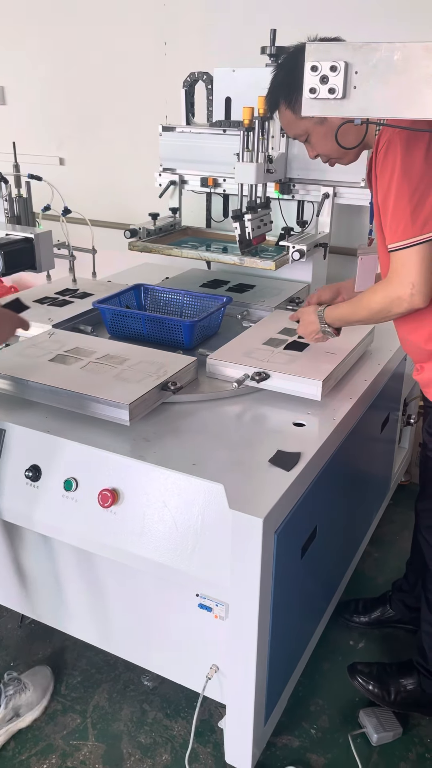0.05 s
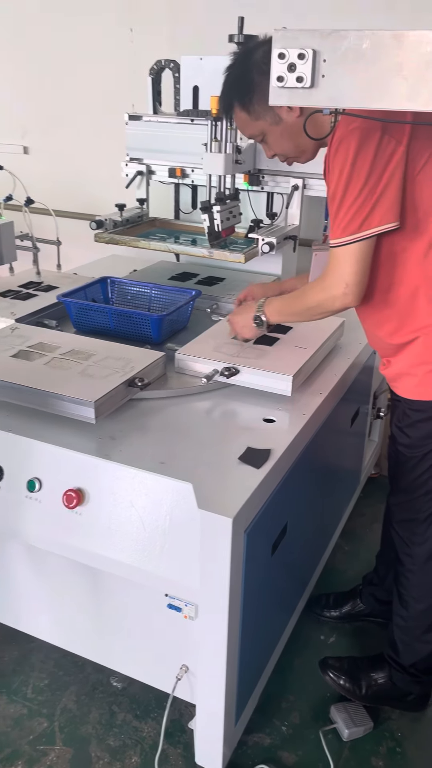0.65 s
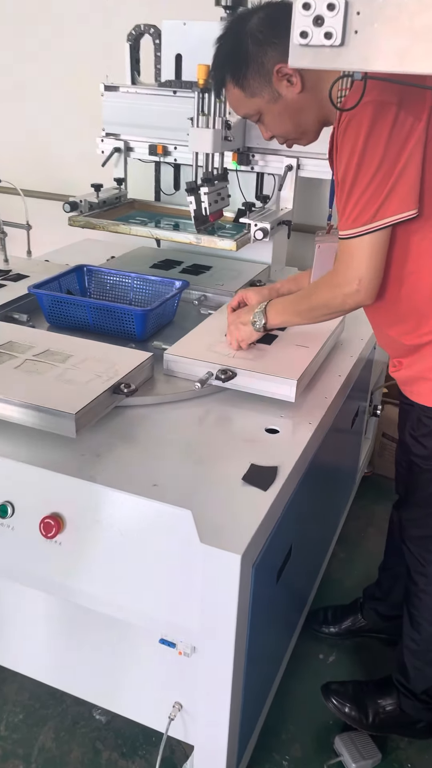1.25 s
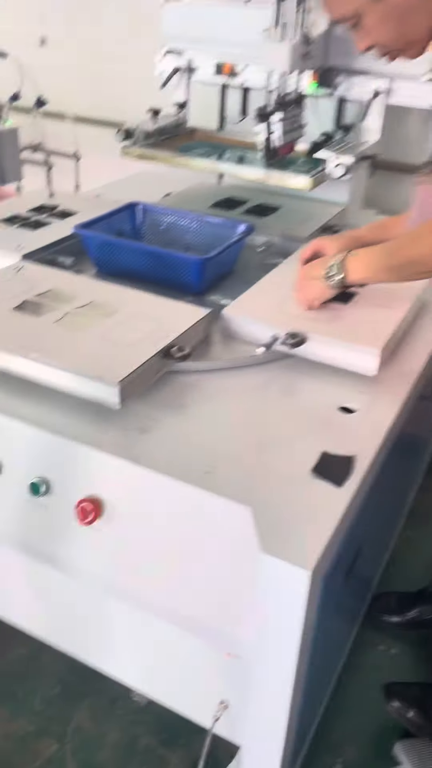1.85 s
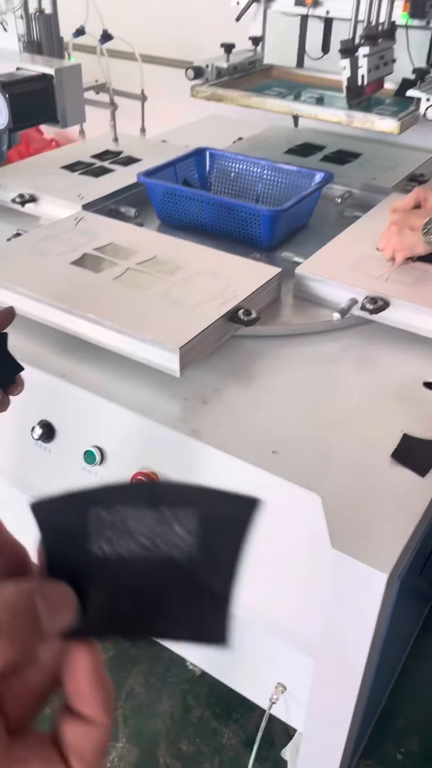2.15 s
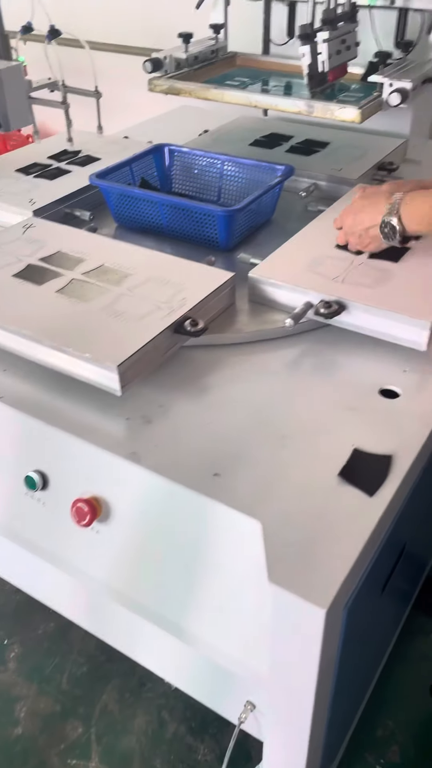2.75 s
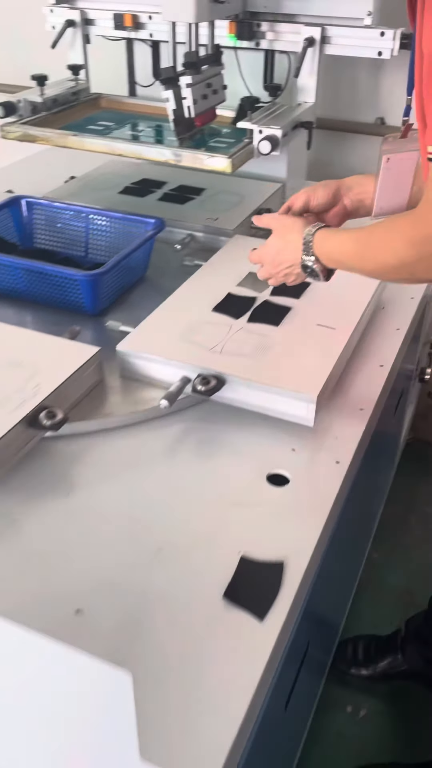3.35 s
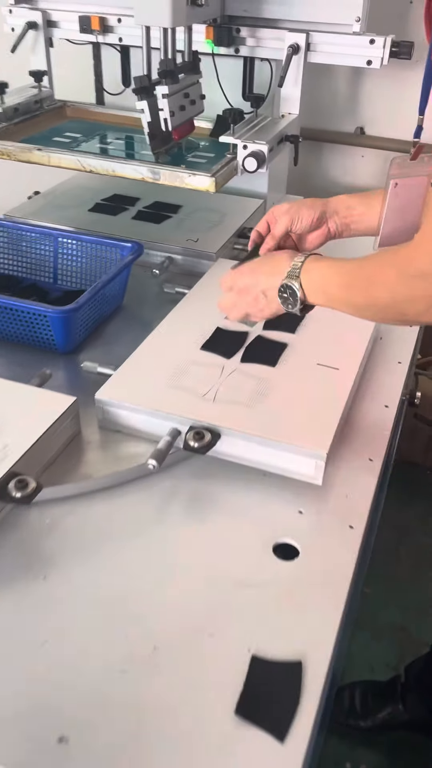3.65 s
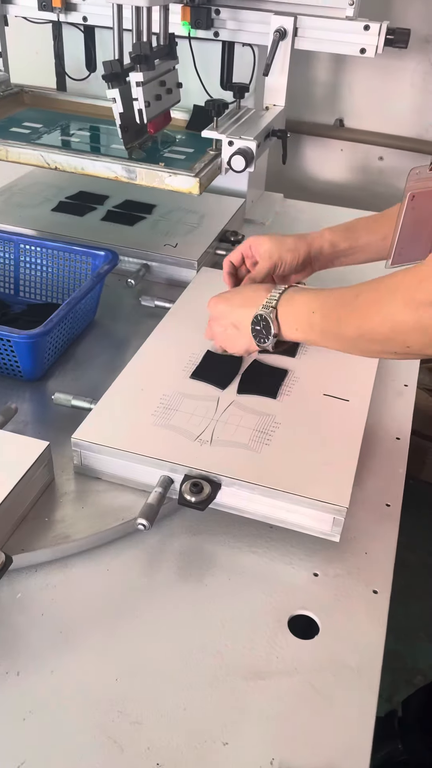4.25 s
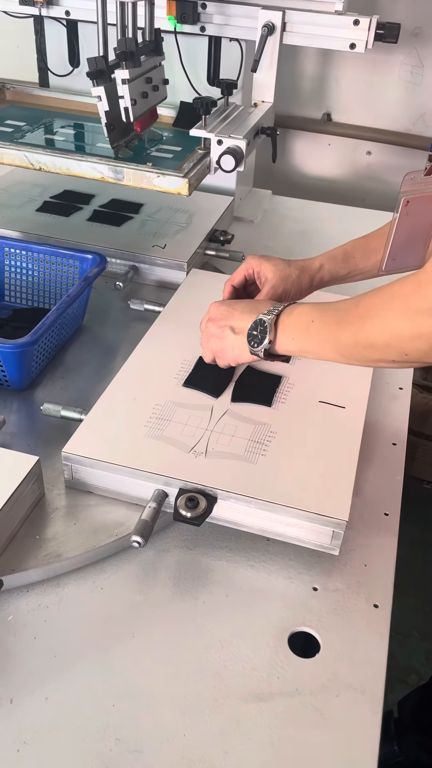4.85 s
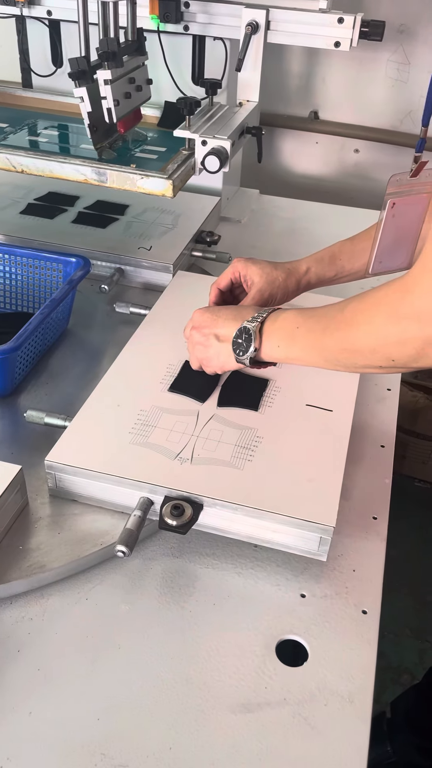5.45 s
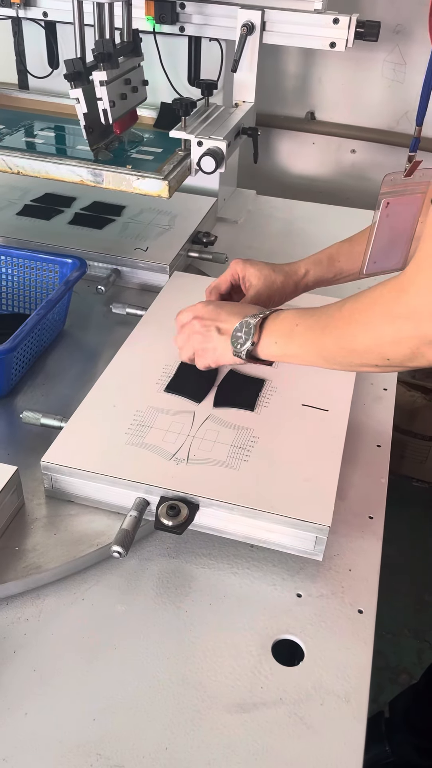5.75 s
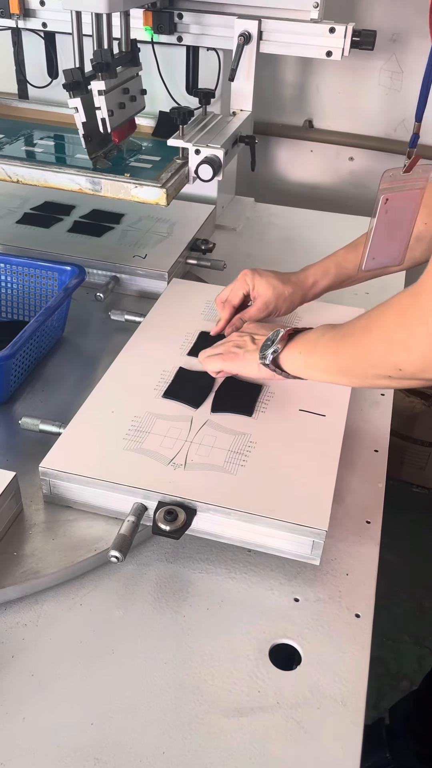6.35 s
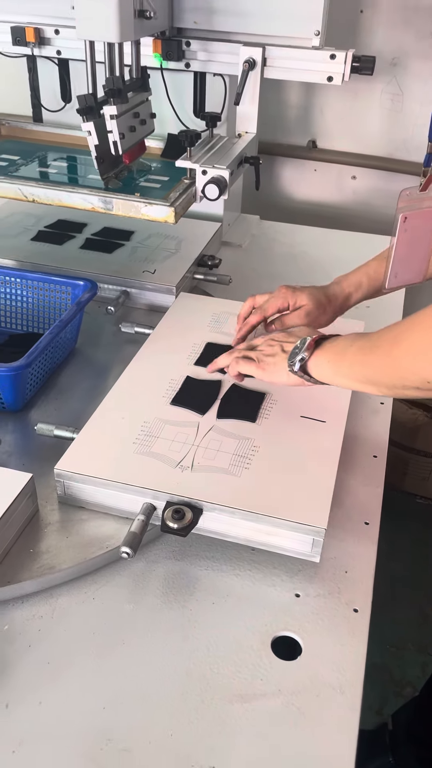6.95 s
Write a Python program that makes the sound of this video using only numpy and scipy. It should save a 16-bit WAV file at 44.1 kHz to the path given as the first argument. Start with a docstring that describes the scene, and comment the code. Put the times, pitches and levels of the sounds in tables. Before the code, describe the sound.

A screen printing machine idles in a workshop. Its vacuum blower gives a high, throbbing whine that swells and fades over a loud motor drone and rushing air. A valve lets off one short puff about two seconds in. As the hand-held microphone moves closer, the drone and a sputtering air leak turn brighter. Near the end the drone gives one brief low boom.

```python
"""A workshop: a screen printer with a rotary vacuum table idles, heard on a hand-held stereo microphone
that moves up to it. The vacuum blower's blades sing a high, throbbing whine, which swells and fades in
standing waves, over rushing air, the drone of motors and panels and the hiss of a leak. The drone's
colour shifts over the first three seconds, then drone and hiss turn close and bright.
A valve lets off one short puff, and near the end the drone booms once."""
import sys
import numpy as np
from scipy import signal
from scipy.fft import next_fast_len
from scipy.io import wavfile
from scipy.ndimage import uniform_filter1d

SR = 44100
rng = np.random.default_rng(int(sys.argv[2]) if len(sys.argv) > 2 else 0)


def put_to_file(sound):
    """Save the sound as 16-bit audio at rate SR, in the file named by the first command-line argument."""
    columns = np.atleast_2d(sound).T  # one column per channel
    safe = np.clip(columns, -1, 1)
    whole_steps = np.round(safe * 32767)
    wavfile.write(sys.argv[1], SR, whole_steps.astype(np.int16))


N = 308259
FRAME, HOP = 4096, 1024  # noise is shaped frame by frame; both in samples
TIME = np.arange(N) / SR
FRAME_TIME = np.arange(N // HOP + 5) * HOP / SR
BIN_HZ = np.fft.rfftfreq(FRAME, 1 / SR)
# how close the printer sounds: t/s, blend (0 far colour, 1 near colour)
NEARNESS = [(0, 0.55), (2.6, 0.05), (3.4, 0.24), (4.1, 1), (7, 1)]


def blower_whine(jitter_hz=0.22, throb_hz=(15.5, 15), throb_drift_hz=0.77, hand_shake=0.08):
    """The blade tone with its throb, rattle, whistle and octave, heard through standing waves."""
    # blade tone at the microphone: t/s, left level/dB, right level/dB
    tone_levels = [(0, -22, -28), (.27, -26, -31.5), (.5, -24.5, -40), (.63, -26, -35), (.83, -19.8, -38),
                   (1.0, -23.5, -34.5), (1.12, -23, -34), (1.35, -28.5, -26.8), (1.52, -29, -26),
                   (1.6, -38, -28), (1.75, -26, -33), (1.92, -38.5, -39), (2.05, -41, -32.5),
                   (2.25, -42.3, -33), (2.5, -32, -38), (2.62, -30.5, -36), (2.82, -32.1, -28.8),
                   (3.13, -34, -31.5), (3.22, -26.5, -28.5), (3.31, -25, -29), (3.43, -31.4, -31.5),
                   (3.6, -27.5, -25.3), (3.73, -23, -27), (3.88, -25, -34), (4.05, -24, -30.8),
                   (4.22, -20.8, -28.8), (4.98, -20.6, -30), (5.1, -23, -31.5), (5.3, -22.5, -29.3),
                   (5.65, -23, -29.8), (5.88, -21.6, -30), (6.04, -24.5, -30), (6.22, -39, -34),
                   (6.32, -38, -32), (6.44, -44.5, -40), (6.6, -32.5, -35.7), (6.85, -26.3, -26),
                   (6.99, -26, -23.5)]
    # direction it arrives from: t/s, left phase lead/rad
    bearing = [(0, 2.1), (.47, 1.4), (.55, 0.4), (.77, 1.1), (.84, 2.5), (1, 1.5), (1.15, 4), (1.65, 1.7),
               (1.92, 2.3), (2.05, 1), (2.4, 3), (3.1, 2.5), (3.4, 0.5), (3.6, 0.4), (3.77, 0.7),
               (3.92, -0.9), (4.3, 0.36), (5.4, 0.67), (5.9, 1.1), (6.6, 1.9), (6.99, 0.6)]
    # the blower slows a little as its load changes: t/s, blade tone f/Hz
    pitch = [(0, 2447.5), (.45, 2447), (1, 2451), (1.4, 2445), (1.8, 2447), (2.2, 2445.5), (2.4, 2441.5),
             (2.8, 2438), (3.1, 2439), (3.55, 2433.5), (4.9, 2433.3), (5.3, 2430.3), (5.8, 2433),
             (6.2, 2419), (6.6, 2414), (6.99, 2418.5)]
    # the throb's sidebands on the left: t/s, lower level/dB, upper level/dB
    sideband_levels = [(0, -46, -42), (.25, -36, -39), (.55, -49, -50), (.85, -38, -33), (.96, -41, -41),
                       (1.06, -34.5, -35), (1.3, -42, -45), (1.55, -43, -47), (1.8, -30.5, -46),
                       (1.9, -36, -43), (2.05, -31.5, -37), (2.22, -39, -37), (2.45, -29, -36),
                       (2.67, -26, -33.5), (3, -31, -37), (3.3, -44, -50), (3.55, -42, -47),
                       (3.7, -35, -35), (3.85, -45, -44), (4, -38, -38), (4.3, -45, -40), (5.7, -39, -40.5),
                       (6.3, -45, -43), (6.7, -42, -36), (6.99, -40, -40)]
    # octave of the blade tone: t/s, level/dB
    octave_levels = [(0, -72), (1.0, -64), (1.3, -50), (1.85, -67), (2.1, -50), (2.5, -62), (2.8, -51),
                     (3.2, -59), (3.5, -52), (4.4, -65), (5.9, -72), (6.5, -57), (6.99, -65)]
    left_db, right_db = follow(tone_levels, TIME)
    lead = follow(bearing, TIME)[0]
    blades = spin(follow(pitch, TIME)[0] + jitter_hz * flutter(6.9).real)
    tone = np.array([gain_of(left_db), gain_of(right_db) * np.exp(-1j * lead)])
    tone *= 1 + hand_shake * flutter(5)  # the hand trembles within the standing waves
    throb = spin(by_nearness(*throb_hz) + throb_drift_hz * flutter(7.9).real)
    # the room shifts one sideband against the other: part tremolo, part vibrato
    skew = np.exp(1j * (0.3 + 0.7 * flutter(0.37).real))
    lower_db, upper_db = follow(sideband_levels, TIME)
    lower = fading(lower_db) / throb
    upper = fading(upper_db) * throb * skew
    right = lower * gain_of(by_nearness(-5, 1)) + upper * gain_of(-13)
    sidebands = np.array([lower + upper, right * np.exp(-1j * (lead - 1.17))])
    octave = fading(follow(octave_levels, TIME)[0]) * blades ** 2
    around_blades = tone + sidebands + shaft_rattle() + whistle()
    return np.sqrt(2) * (blades * around_blades + octave).real


def shaft_rattle(shaft_hz=48.5, wander_hz=6):
    """The turning shaft puts a line on either side of the blade tone."""
    # shaft order, far level/dB, near level/dB, right minus left/dB
    lines = [(-1, -48, -50, 3.5), (1, -50, -48, -10)]
    shaft = spin(shaft_hz + wander_hz * flutter(5.86).real)
    rattle = 0
    for order, far_db, near_db, right_db in lines:
        line = fading(by_nearness(far_db, near_db)) * shaft ** round(order)
        rattle += np.outer([1, gain_of(right_db)], line)
    return rattle


def whistle(right_db=0.5, lead_rad=0.99, coherence=0.89):
    """The hoarse whistle around the blade tone reaches the microphone partly by way of the walls."""
    # hoarser at the table and again as the blower slows: t/s, level/dB
    hoarseness = [(0, -44), (1.3, -39.5), (3.1, -39.5), (3.25, -36), (4.3, -34), (5.2, -35), (5.82, -35.5),
                  (6.05, -32), (6.99, -32.5)]
    direct, echo = turbulence(), turbulence()
    right = coherence * direct + np.sqrt(1 - coherence ** 2) * echo
    right *= gain_of(right_db) * np.exp(-1j * lead_rad)
    return gain_of(follow(hoarseness, TIME)[0]) * np.array([direct, right])


def turbulence():
    """Air ringing in the blower housing: a complex swirl of rms 1 to ride on the blade tone."""
    # offset from the blade tone/Hz, width/Hz, far weight/dB, near weight/dB
    bands = [(-89, 16, -7, 12), (-51, 20, 4, 10.5), (-66, 67, 0, 10), (-120, 160, 6.5, -10), (46, 26, 3, 3),
             (10, 110, 8, 7)]
    gains = [gain_of(by_nearness(far_db, near_db)) for _, _, far_db, near_db in bands]
    swirls = [flutter(width / 2) * spin(offset) for offset, width, _, _ in bands]
    return sum(gain * swirl for gain, swirl in zip(gains, swirls)) / np.linalg.norm(gains, axis=0)


def drone(gain_db=0.5, ripple_db=1.46, air_db=(0.8, -0.2), echo_db=(2.0, 0.7)):
    """Motor rumble and rushing air, coloured by shifting resonances of the cabinet and the room."""
    # base spectrum of motors and air: f/Hz, density/(dB per Hz)
    rush = [(20, -81), (32, -85), (46, -63), (100, -59.5), (170, -64), (230, -70), (400, -69), (500, -74),
            (700, -71.5), (1250, -72.5), (1420, -75), (2200, -74), (2900, -79.5), (4200, -102)]
    # the low end rises and falls: t/s, rumble lift/dB, body lift/dB
    low_end = [(0, 0.5, -2), (1.2, -3, 1), (2.0, 4.5, 1), (3.2, 0.5, 2), (3.7, 5.5, 1.5), (5.3, 0, 0.5),
               (6.99, 4, 0.5)]
    # cabinet and room resonances: f/Hz, width/Hz, far lift/dB, near lift/dB
    panels = [(105, 13, 4, 4.5), (128, 10, -12, -1), (170, 29, 7.5, 7), (199, 12, 12, 8), (228, 25, -2, 4),
              (262, 18, 14, 13), (312, 28, 13, 16), (355, 20, 6, 4), (372, 12, 2, 5), (393, 14, 9, 12),
              (440, 30, 6, 4), (456, 14, 7, 6), (545, 28, 7, 9), (574, 22, 4, 9.5), (622, 30, 6, 10),
              (700, 26, 0, 10), (770, 42, 2, 10), (850, 18, 1, 8), (891, 18, 6, 9), (924, 14, 3, 9),
              (982, 18, -1, 6), (1009, 16, 2, 7.5), (1053, 28, 3, 10.5), (1104, 20, 6, 10),
              (1128, 14, 5, 6), (1159, 20, 2, 8.5), (1208, 30, 5, 11), (1268, 22, 7, 3),
              (1299, 26, -2, 12.5), (1400, 26, 2, 5), (1570, 60, -2, 4.5), (1935, 60, 3, 5),
              (2020, 50, 1, 5), (2176, 36, 4, 9), (2260, 80, 5, 6)]
    t = FRAME_TIME[:, None]
    rumble_db, body_db = follow(low_end, t)
    deep = 1 / (1 + (BIN_HZ / 135) ** 4)
    low = 1 / (1 + (BIN_HZ / 480) ** 4)
    panels_db = sum(np.outer((far, near), bump(BIN_HZ, hz, width)) for hz, width, far, near in panels)
    density_db = spectrum(rush)[0] + deep * rumble_db + (low - deep) * body_db
    density_db += by_nearness(*panels_db, t) + band_swells(t)
    density_db += (1 - low) * (by_nearness(*air_db, t) + by_nearness(*echo_db, t) * wall_echoes(t))
    return gain_of(gain_db) * room_noise(density_db, ripple_db * (1 - low))


def motor_hum(waver_hz=4, thin_hz=5911):
    """Motor tones that waver in strength and phase; one thin, high one swells in the standing waves."""
    # f/Hz, far level/dB, near level/dB, waver (0-1)
    motor_tones = [(68, -50, -57, .8), (112, -47, -50, .6), (136.3, -47, -46.5, .5), (155, -47, -50, .8),
                   (199.4, -40, -43, .4), (262, -48, -49, .9), (275, -55, -55, .7), (353, -53, -57, .7),
                   (454, -58, -59, .8), (764, -64, -55.5, 1), (895, -54, -60, .8), (1104, -53, -52.5, .9),
                   (1211, -57, -52.5, .9), (1299, -66, -56, .9), (4208, -64, -68, .6), (6092, -64, -67, .6),
                   (6185, -65, -69, .6)]
    # the thin tone: t/s, level/dB
    thin_levels = [(0, -61), (1, -58), (2.4, -61), (3.2, -55), (3.7, -59), (4.25, -52), (4.8, -60),
                   (5.4, -62), (6, -57), (6.5, -58), (6.99, -54)]
    tones = 0
    for hz, far_db, near_db, waver in motor_tones:
        tone = gain_of(by_nearness(far_db, near_db)) * spin(hz)
        tones += tone * unit_rms(1 + waver * flutter(waver_hz))
    thin_tone = fading(follow(thin_levels, TIME)[0]) * spin(thin_hz)
    return np.sqrt(2) * (tones + thin_tone).real


def boom(peak_s=6.205, length_s=0.06, hz=311, level_db=-29.5):
    """One low resonance of the drone swells briefly and dies away."""
    return np.sqrt(2) * gain_of(level_db) * bump(TIME, peak_s, length_s) * spin(hz).real


def leak_hiss(leak_db=-2, sputter=0.45, step_db=2.82, bounce=0.125, comb_hz=620):
    """A sputtering jet of leaking air, summed in power with the hiss of the whole shop."""
    # base spectrum of the leak from close by: f/Hz, density/(dB per Hz)
    leak_spectrum = [(2000, -100), (3800, -76), (5500, -75), (7500, -72.5), (9500, -72), (11300, -69.3),
                     (12200, -73), (14000, -67.5), (15200, -61), (16000, -59.5)]
    # the leak grows as the microphone comes up: t/s, level/(steps of step_db at 11 kHz)
    leak_strength = [(0, -7), (2.65, -5.5), (3.0, -3), (4.5, -1.2), (5.8, -1.5), (6.0, -2.5), (6.99, -3)]
    # hiss of the shop: f/Hz, density/(dB per Hz)
    shop_spectrum = [(1500, -100), (3000, -77), (4200, -80), (5300, -77), (6300, -80.5), (7500, -81.5),
                     (9000, -83.5), (10500, -86.5), (12500, -94), (15500, -95)]
    t = FRAME_TIME[:, None]
    strength = follow(leak_strength, t)[0] + sputter * swell(rate_hz=9)
    # the highest hiss comes and goes most
    reach_db = strength * step_db * (BIN_HZ / 11000) ** 0.067
    # the table top reflects the leak and ripples its spectrum
    comb = abs(1 + bounce * np.exp(2j * np.pi * BIN_HZ / comb_hz))
    leak = comb * gain_of(leak_db + spectrum(leak_spectrum)[0] + reach_db)
    shop = gain_of(spectrum(shop_spectrum)[0])
    return room_noise(10 * np.log10(shop ** 2 + leak ** 2) + band_swells(t))


def valve_puff(start_s=1.9, open_s=0.225, attack_s=0.11, t60_s=0.2):
    """The valve opens, blows and shuts; its hiss dies quickly."""
    # escaping air: f/Hz, density/(dB per Hz)
    puff_spectrum = [(2000, -95), (4300, -82), (5000, -73), (6100, -68.5), (7300, -74), (9000, -80.5),
                     (12500, -86), (15500, -88)]
    opening = np.clip((TIME - start_s) / attack_s, 0, 1)
    since_shut = np.maximum(TIME - start_s - open_s, 0)
    return opening * gain_of(-60 * since_shut / t60_s) * room_noise(spectrum(puff_spectrum)[0])


def band_swells(t):
    """Lift in dB of the bands of the drone and hiss that swell and fade."""
    # peak t/s, length/s, f/Hz, width/Hz, lift/dB
    swells = [(0.6, 2.4, 895, 50, 3), (2.5, 1.2, 420, 140, 3), (2.87, 0.7, 800, 200, 4),
              (2.92, 0.8, 1210, 240, 5), (2.95, 0.7, 2130, 400, 5), (0.9, 2, 5250, 400, 1.8),
              (3.4, 1.4, 5240, 400, 3.3), (3.5, 1.6, 6300, 1100, 1.8), (4.3, 3.5, 7350, 500, 2),
              (5, 2, 4080, 420, 2.4)]
    return sum(lift_db * bump(t, peak_s, length_s) * bump(BIN_HZ, hz, width)
               for peak_s, length_s, hz, width, lift_db in swells)


def wall_echoes(t, count=8, delay_range_s=(.004, .022), sound_m_per_s=343):
    """Comb pattern of rms 1 from the walls; it slides as the microphone's travel changes each path."""
    # the microphone's travel: t/s, distance covered/m
    travel = [(0, 0), (1.4, .15), (3.7, 1.1), (4.3, 1.2), (6.99, 1.25)]
    travel_s = follow(travel, t)[0] / sound_m_per_s
    delays_s = rng.uniform(*delay_range_s, count)
    headings = rng.uniform(-1.015, 1, count)
    return unit_rms(sum(np.cos(2 * np.pi * BIN_HZ * (delay + heading * travel_s))
                        for delay, heading in zip(delays_s, headings)))


def room_noise(density_db, ripple_db=2.1):
    """Stereo noise of the given density (dB per Hz), rippled by the room."""
    # stereo image, opposite in phase near 7-8 kHz: f/Hz, left-right likeness (0-1), left phase lead/rad
    stereo_image = [(200, 1, 0), (350, .95, -.15), (750, .79, -.45), (1400, .75, -.25), (1900, .94, 0),
                    (2550, .65, 1.2), (3200, .2, 1), (4400, .68, 1), (5200, .99, 0), (6200, .7, 1.4),
                    (7200, .998, 3.08), (8200, .998, 3.2), (9300, .67, 4.8), (10500, .99, 6.2),
                    (11800, .99, 6.3), (12600, .68, 7.6), (13700, .99, 9.4), (14800, .99, 9.5),
                    (15800, .7, 10.4)]
    draws = rng.standard_normal((4, len(FRAME_TIME), len(BIN_HZ)))
    left, unrelated = draws[::2] + 1j * draws[1::2]
    # standing waves favour some frequencies, and their pattern turns over between far and near
    far, near = unit_rms(uniform_filter1d(rng.standard_normal((2, len(BIN_HZ))), size=2, axis=1))
    turn = np.pi / 2 * follow(NEARNESS, FRAME_TIME)[0][:, None]
    ripple = unit_rms(gain_of(ripple_db * (np.cos(turn) * far + np.sin(turn) * near)))
    likeness, lead = spectrum(stereo_image)
    right = (likeness * left + np.sqrt(1 - likeness ** 2) * unrelated) * np.exp(-1j * lead)
    frames = np.array([left, right]) * ripple * gain_of(density_db) * np.sqrt(1.5 * SR / FRAME)
    _, noise = signal.istft(frames, nperseg=FRAME, noverlap=FRAME - HOP, time_axis=1, freq_axis=2)
    return noise[:, :N]


def by_nearness(far, near, t=TIME):
    """A value that slides between far and near with how close the printer sounds."""
    return far + follow(NEARNESS, t)[0] * (near - far)


def fading(level_db, depth=0.35, rate_hz=4):
    """Complex gain of a tone that wavers about the given level."""
    return gain_of(level_db) * unit_rms(1 + depth * flutter(rate_hz))


def flutter(width_hz):
    """Complex noise of rms 1 around zero frequency; on a carrier it is a fuzzy resonance."""
    size = next_fast_len(N // 16)
    hz = np.fft.fftfreq(size, N / SR / size)
    slow = np.fft.ifft(np.exp(2j * np.pi * rng.random(size)) / (1 + (hz / width_hz) ** 2))
    return unit_rms(np.interp(TIME, np.linspace(0, N / SR, size), slow))


def swell(rate_hz):
    """A random rise and fall of rms 1, one value a frame."""
    return unit_rms(np.interp(FRAME_TIME, TIME, flutter(rate_hz).real))[:, None]


def spin(hz):
    """A unit phasor that turns at hz from a random phase."""
    return np.exp(2j * np.pi * (np.cumsum(hz * np.ones(N)) / SR + rng.random()))


def follow(rows, t):
    """Each column of a time table at the times t."""
    times, *columns = np.transpose(rows)
    return [np.interp(t, times, column) for column in columns]


def spectrum(rows):
    """Each column of a frequency table at the bin frequencies."""
    hz, *columns = np.transpose(rows)
    return [np.interp(np.log(BIN_HZ + 1), np.log(hz), column) for column in columns]


def bump(x, centre, width):
    """A bell curve of height 1."""
    return np.exp(-2 * ((x - centre) / width) ** 2)


def gain_of(db):
    """Decibels to amplitude."""
    return 10 ** (np.asarray(db) / 20)


def unit_rms(x):
    """Scales to rms 1."""
    return x / np.sqrt(np.mean(abs(x) ** 2) + 1e-20)


def scene():
    """The idling printer and the shop at the microphone."""
    return blower_whine() + drone() + motor_hum() + boom() + leak_hiss() + valve_puff()


def record(dry, low_cut_hz=36, band_limit_hz=15750):
    """The recorder's low cut and band limit."""
    low_cut = signal.butter(N=4, Wn=low_cut_hz, btype="high", fs=SR, output="sos")
    band_limit = signal.firwin(1023, band_limit_hz, window=("kaiser", 9), fs=SR)
    return signal.oaconvolve(signal.sosfilt(low_cut, dry), band_limit[None], "same")


dry = scene()
out = record(dry)
put_to_file(out)
```